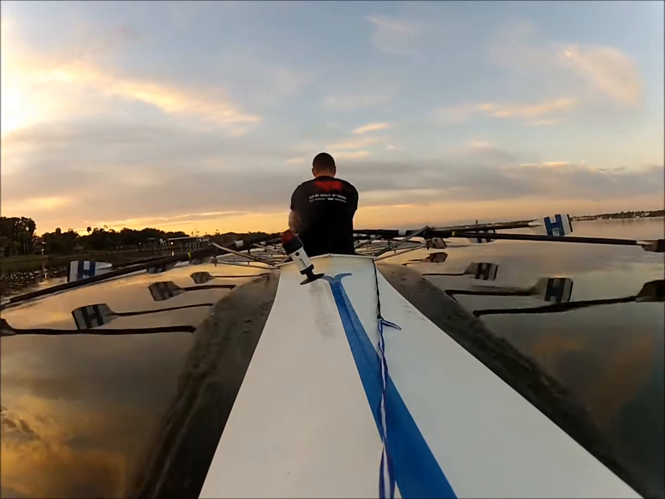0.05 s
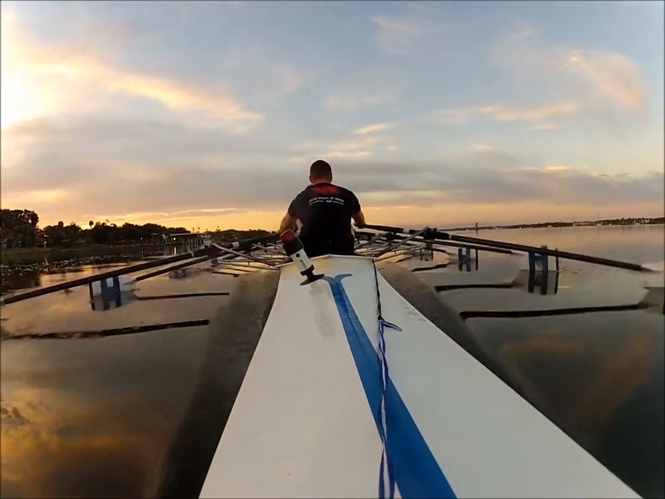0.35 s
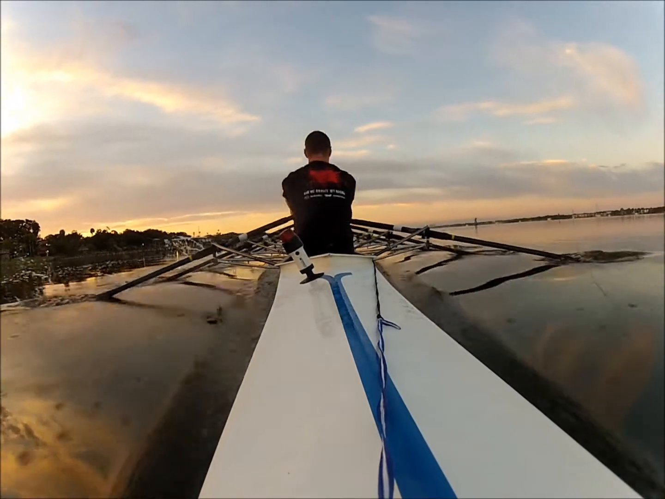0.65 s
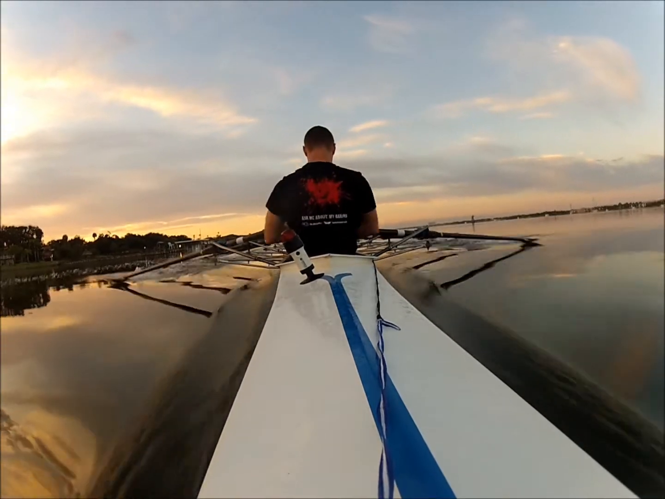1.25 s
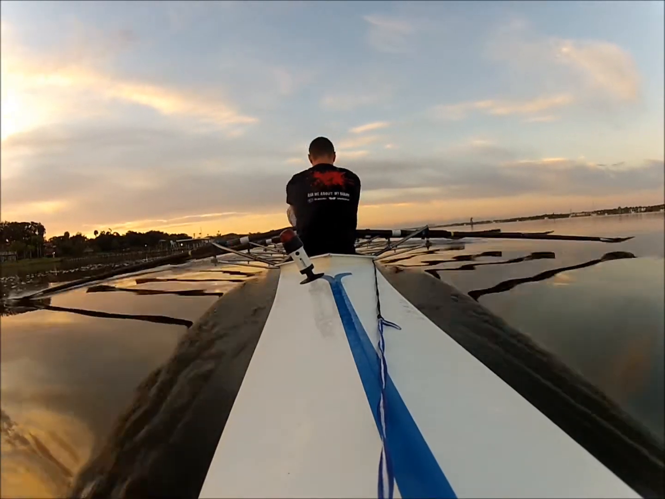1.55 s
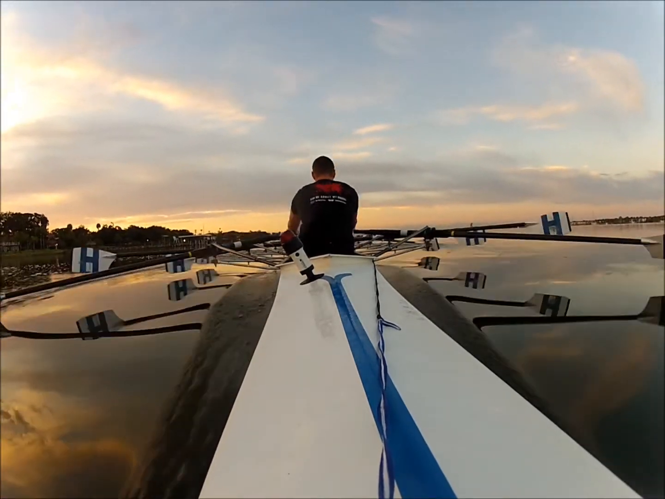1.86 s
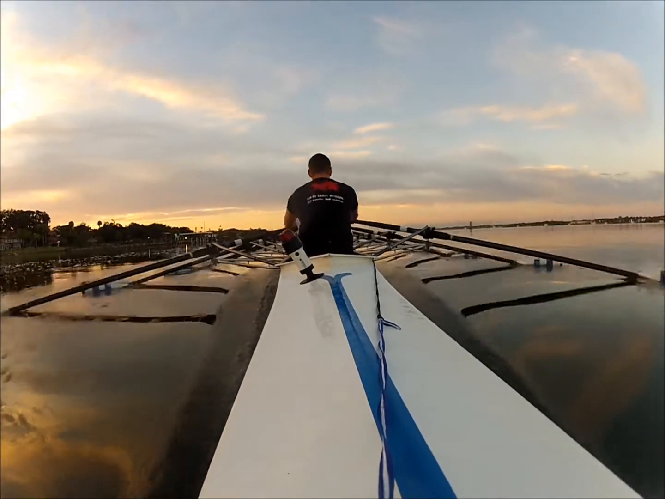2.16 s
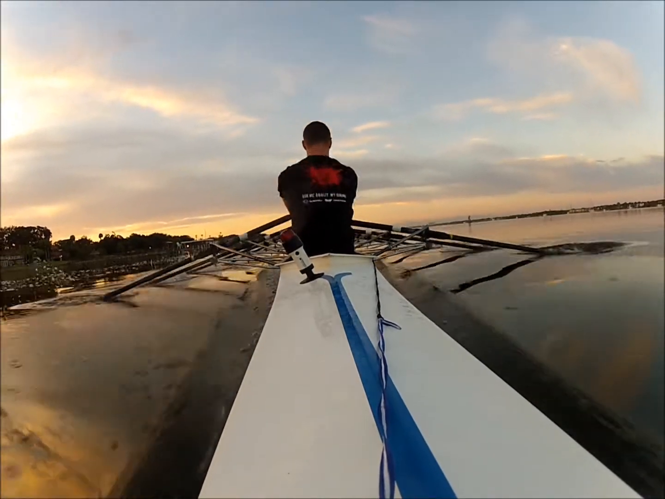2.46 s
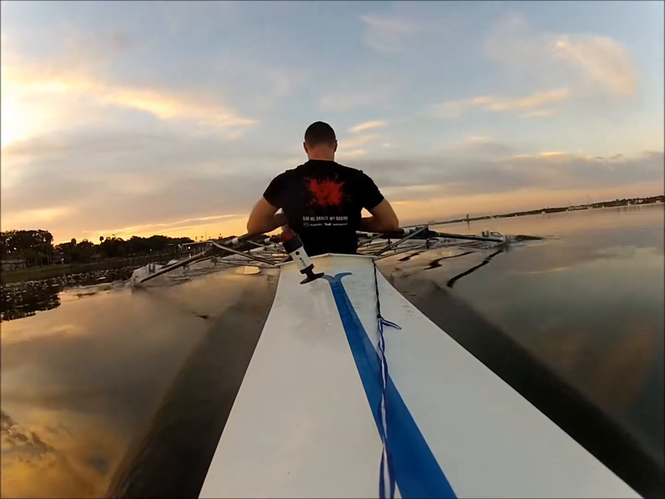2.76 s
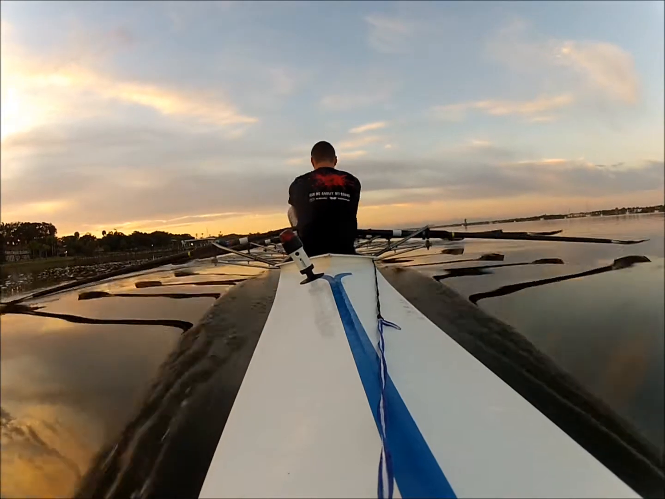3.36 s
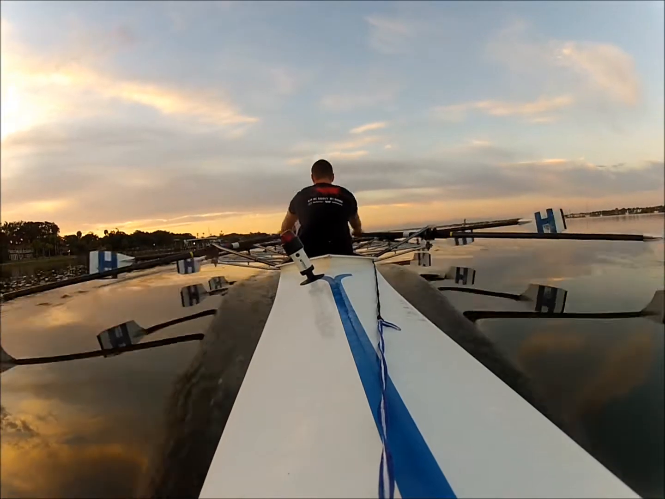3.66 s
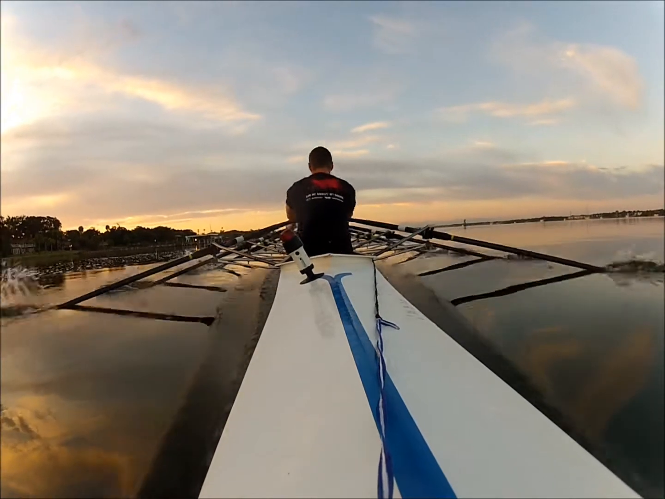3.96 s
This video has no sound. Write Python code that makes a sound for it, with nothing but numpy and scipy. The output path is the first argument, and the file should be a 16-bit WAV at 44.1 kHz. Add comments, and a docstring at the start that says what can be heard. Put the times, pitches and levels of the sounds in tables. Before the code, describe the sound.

Oars knock hollowly and rhythmically as a rowing boat moves through rushing water.

```python
"""Hollow thumps over rushing water: a racing shell is rowed, heard from a closed camera housing on deck.
At each catch and finish the oars excite the hull's resonances and clack in their locks. Seats roll
during the drive, water rushes along the hull during the recovery, and wind buffets the housing.
A fine, high crackle comes and goes. The camera clips the thumps and mirrors the sound into the treble."""
import sys
import numpy as np
from scipy.fft import rfft, irfft, next_fast_len
from scipy.io import wavfile
from scipy.ndimage import map_coordinates

SR = 44100
rng = np.random.default_rng(int(sys.argv[2]) if len(sys.argv) > 2 else 0)


def put_to_file(sound):
    """Save the sound as 16-bit audio at rate SR, in the file named by the first command-line argument."""
    columns = np.atleast_2d(sound).T  # one column per channel
    safe = np.clip(columns, -1, 1)
    whole_steps = np.round(safe * 32767)
    wavfile.write(sys.argv[1], SR, whole_steps.astype(np.int16))


N = 176400

# spectrum of wash, bubbles and oarlock rattle in the housing: (frequency [Hz], gain [dB])
HOUSING_TONE = [(100, -18), (300, -12), (400, -1.5), (580, -10), (750, 6), (900, 1.5), (1000, 0.5),
                (1120, 6.5), (1280, -2.5), (1550, 0.5), (1700, -5.5), (1830, 1), (2050, -4), (2350, 0.5),
                (2480, -4.5), (2570, -21.5), (2670, -3.5), (2950, -14), (3300, -19), (4200, -27),
                (5500, -39.5)]
# spectrum of the bright ticks: (frequency [Hz], gain [dB])
CRACKLE_TONE = [(1500, -22.5), (3000, -4), (3700, -2), (4200, -8.5), (4800, 3), (5300, 2), (5700, -6)]


def hull_thumps(overtone_ratio=1.51, overtone_db=-23):
    """Damped free vibration: each blow rings the hollow hull in one strong mode and a weak higher one."""
    # blows of oars and rigging: (time [s], level [dB], pitch [Hz])
    blows = [(0.043, -17, 213), (0.264, -13.5, 190.5), (0.287, -3.5, 180), (0.313, -2.5, 173.2),
             (.350, 0.5, 185), (.364, -3.5, 205.4), (0.388, -8, 159.7), (0.418, -5, 183.7),
             (.535, -14, 177.6), (1.077, -15, 160.4), (1.112, -16, 186), (1.173, 2, 178.2), (1.199, 1, 181),
             (1.226, -2, 186.2), (1.243, 1.5, 167.5), (1.297, -5, 172), (1.324, 0.5, 172.4),
             (1.363, -2, 184.7), (1.405, -10.5, 180.3), (1.583, -17, 185), (1.712, -17.5, 209),
             (1.787, -13, 196.6), (1.925, -11, 198), (1.991, -7.5, 175), (2.017, 0.5, 166.4),
             (2.040, -13, 169), (2.061, -0.5, 196.6), (2.074, -2, 181), (2.313, -9, 184),
             (2.513, -17.5, 193), (2.882, -11.5, 184), (2.899, 1.5, 189), (2.92, -5, 195), (2.949, -3, 179),
             (2.995, -7.5, 185), (3.033, -3.5, 180.5), (3.064, -5.5, 186), (3.51, -11, 192.6),
             (3.531, -16.5, 190), (3.673, -16, 185), (3.763, -3, 158.6), (3.799, -6, 168),
             (3.823, -2, 193.3), (3.985, -15, 192)]
    out, t = np.zeros(N), np.arange(SR // 4) / SR
    for s, db, hz in blows:
        phase = 2 * np.pi * hz * t
        overtone = amp(overtone_db) * np.sin(overtone_ratio * phase + 2 * np.pi * rng.random())
        add(out, s, amp(db) * swell(t, rise_s=0.0099, t60_s=0.099) * (np.sin(phase) + overtone))
    return out


def blade_plunges(pitch_hz=120.9, sag_hz_per_s=190, gain_db=2):
    """A damped oscillation of falling frequency: the water gulps as a blade buries."""
    # blades levering the water: (time [s], relative level [dB])
    plunges = [(0.386, -7.5), (1.371, -12), (2.075, -12), (2.105, -9), (2.178, -12), (3.109, -17),
               (3.795, -12), (3.859, -20)]
    out, t = np.zeros(N), np.arange(SR // 3) / SR
    for s, db in plunges:
        hz = pitch_hz * (1 + 0.045 * rng.standard_normal()) - sag_hz_per_s * t
        gulp = np.sin(2 * np.pi * np.cumsum(hz) / SR)
        add(out, s, amp(db + gain_db) * swell(t, rise_s=0.0057, t60_s=0.28) * gulp)
    return out


def oarlocks(rough_rad=0.13, rattle_db=-14):
    """Impact excitation: plastic rings briefly, roughened by phase jitter, with a shorter rattle."""
    # collars seating in the locks: (time [s], level [dB], pitch [Hz])
    clacks = [(0.271, -21, 1086), (.412, -15.5, 761), (1, -29.5, 1355), (1.003, -31.5, 1124),
              (1.189, -22, 1440), (1.193, -15.5, 1118), (1.205, -20.5, 883), (2.059, -20, 702),
              (2.072, -28, 812), (3.857, -16, 758)]
    ring, rattle, t = np.zeros(N), np.zeros(N), np.arange(SR // 5) / SR
    for s, db, hz in clacks:
        phase = 2 * np.pi * hz * t + rough_rad * wobble(300)[:len(t)]
        add(ring, s, amp(db) * swell(t, rise_s=0.009, t60_s=0.06) * np.sin(phase))
        add(rattle, s, amp(db + rattle_db) * swell(t, rise_s=0.009, t60_s=0.024))
    return ring + rattle * noise(HOUSING_TONE)


def hull_drumming(gain_db=2, lumpy_db=1.5):
    """Forced vibration: ripples and the moving crew keep the hull's low modes booming."""
    # strength of the boom: (time [s], relative level [dB])
    levels = [(0, -27.5), (.42, -23), (.68, -30), (1.02, -32), (1.27, -26.5), (1.65, -32.5), (2.08, -21.5),
              (2.45, -30.5), (2.75, -33), (2.99, -20), (3.3, -28), (3.62, -25.5), (3.84, -17), (4, -25)]
    # hull resonances: (frequency [Hz], gain [dB])
    tone = [(60, -19.5), (100, -4), (120, -1.5), (145, -7.5), (175, -2), (197, 6), (222, -7.5), (270, -8),
            (330, -22.5), (420, -25.5), (600, -43.5), (1200, -63.5)]
    return amp(curve(levels) + gain_db + lumpy_db * wobble(20)) * noise(tone)


def blade_churn(rough_db=2):
    """Turbulence: water splashes dully round the blades as they go in and come out."""
    # catches and finishes: (start [s], end [s], level [dB])
    churns = [(.27, .44, -28), (1.178, 1.235, -23), (1.24, 1.35, -33.5), (2.0, 2.1, -27), (2.89, 3.12, -29),
              (3.78, 3.89, -29.5)]
    # splash spectrum: (frequency [Hz], gain [dB])
    tone = [(150, 0), (270, 16), (340, 1), (420, 5.5), (560, -9.5), (740, 13), (880, 4.5), (1100, 0.5),
            (1450, -8), (2300, -21), (3300, -56), (5500, -61)]
    return spells(churns, edge_s=0.0027) * amp(rough_db * wobble(70)) * noise(tone)


def hull_wash(flutter_db=1.0, bubble_db=-5):
    """Flow noise: rushing water and gurgling bubbles, louder as the shell runs faster."""
    # water along the hull: (time [s], level [dB])
    levels = [(0, -27.5), (.2, -27), (.42, -32), (.73, -37.5), (.88, -39), (.995, -42), (1.01, -37.5),
              (1.16, -33), (1.3, -34.5), (1.55, -30.5), (1.9, -26), (2.15, -33.5), (2.5, -37.5),
              (2.56, -41), (2.72, -38), (2.83, -36), (2.97, -35.5), (3.2, -33), (3.52, -27), (3.74, -28),
              (3.92, -32.5), (4, -36.5)]
    gain = amp(curve(levels) + flutter_db * wobble(35))
    return gain * unit(noise(HOUSING_TONE) + amp(bubble_db) * bubbles())


def bubbles(per_s=160, typical_hz=1601.5, life_cycles=9.4, rise_per_life=0.0412):
    """Bubble resonance: each pocket of air rings briefly and rises in pitch."""
    spread_octaves, spread_db = 0.5, 2.5
    out, t = np.zeros(N), np.arange(SR // 25) / SR
    for pitch, size in np.clip(rng.standard_normal((int(per_s * N / SR), 2)), -2, 2):
        cycles = typical_hz * 2 ** (spread_octaves * pitch) * t
        age = cycles / life_cycles
        chirp = age * np.exp(-age) * np.sin(2 * np.pi * cycles * (1 + rise_per_life * age / 2))
        add(out, rng.random() * N / SR, amp(spread_db * size) * chirp)
    return unit(coloured(out, HOUSING_TONE))


def seats():
    """Rolling noise: wheels rumble on their tracks while the legs push."""
    # slides toward the bow: (start [s], end [s], level [dB])
    slides = [(0.493, 0.765, -29), (2.21, 2.518, -29.5), (3.949, 4.2, -26.5)]
    # rumble spectrum: (frequency [Hz], gain [dB])
    tone = [(200, -7), (450, -3), (620, -11.5), (760, 2.5), (950, 0), (1150, -3), (1450, -12.5),
            (2200, -30), (3200, -54), (5500, -75)]
    return spells(slides, edge_s=0.027) * amp(wobble(50)) * noise(tone)


def loud_crackles(count=8, burst_s=0.0075, gain_db=16, fade_db=1.5):
    """Filtered impulses: short, bright crackles, each a handful of fading ticks."""
    # bursts of ticks: (time [s], relative level [dB])
    bursts = [(0.0209, -36), (0.1344, -41.5), (0.2284, -36.5), (0.304, -33.5), (0.3226, -36), (0.351, -31),
              (0.41, -35), (0.5114, -41.5), (0.5255, -33), (1.2394, -40), (1.2905, -26.5), (1.3207, -25),
              (1.336, -28.5), (1.364, -25.5), (1.3874, -28.5), (1.415, -25.5), (1.509, -28),
              (1.5302, -28.5), (1.5557, -26.5), (1.625, -30.5), (1.6743, -34.5), (1.8168, -42),
              (2.0492, -31), (2.2408, -37), (2.9871, -29), (3.057, -25), (3.089, -26), (3.1068, -35.5),
              (3.1257, -26.5), (3.1596, -28.5), (3.4007, -31), (3.439, -30), (3.5902, -39), (3.8026, -29),
              (3.8345, -26.5), (3.902, -27), (3.931, -30.5), (3.9756, -29)]
    ticks = np.zeros(N)
    for s, db in bursts:
        for k, delay in enumerate(np.sort(rng.random(count)) * burst_s):
            add(ticks, s + delay, amp([db + gain_db - fade_db * k]) * rng.choice([-1, 1]))
    return coloured(ticks, CRACKLE_TONE)


def fine_crackle(first_ticks_per_s=210, thinning=0.67, uneven=0.41, fade_db=9, scatter_db=3):
    """Shot noise: runs of fine, high ticks that thin out and fade."""
    # runs of ticks: (start [s], duration [s], opening level [dB])
    runs = [(0, 0.54, -47.5), (0.492, 0.086, -39.5), (1.233, 0.47, -35), (1.754, 0.26, -45),
            (2.07, .03, -47), (2.25, 0.034, -46.5), (2.418, 0.021, -47), (2.758, 0.19, -46.5),
            (2.95, 0.67, -37.5), (3.985, 0.026, -34.5)]
    envelope, t = np.zeros(N), np.arange(SR // 100) / SR
    tick_decay = np.exp(-t / 0.0017)
    for start, length, db in runs:
        s = 0
        for gap, size in rng.standard_normal((200, 2)):
            if s >= length:
                break
            age = s / length
            add(envelope, start + s, amp(db - fade_db * age + scatter_db * size) * tick_decay)
            s += np.exp(thinning * age + uneven * gap) / first_ticks_per_s
    return envelope * noise(CRACKLE_TONE)


def wind(gain_db=2, gust_db=1.5):
    """Turbulent pressure fluctuations: wind buffets the housing with a low, lumpy rumble."""
    # gusts: (time [s], relative level [dB])
    levels = [(0, -37), (.13, -58), (.25, -26.5), (.42, -23), (.65, -34), (.76, -47), (1.12, -40.5),
              (1.22, -23), (1.42, -21), (1.72, -37), (1.9, -47), (2.0, -24.5), (2.3, -44), (2.84, -42),
              (2.96, -19), (3.12, -19), (3.25, -26), (3.45, -27), (3.6, -46.5), (3.73, -34), (3.82, -25),
              (4, -39)]
    # buffeting spectrum: (frequency [Hz], gain [dB])
    tone = [(12, -5.5), (27, 0), (42, 1), (58, -5), (78, -7), (110, -4), (250, -25.5), (800, -65)]
    return amp(curve(levels) + gain_db + gust_db * wobble(14)) * noise(tone)


def lapping(level_db=-48.5, waver_db=1.9):
    """Amplitude-modulated noise: calm water murmurs faintly throughout."""
    # murmur spectrum: (frequency [Hz], gain [dB])
    tone = [(250, 8), (550, -1), (900, -8), (2500, -8), (4000, -17.5), (5500, -31.5)]
    return amp(level_db + waver_db * wobble(8.6)) * noise(tone)


def amp(db):
    """Decibels to gain."""
    return 10 ** (np.asarray(db) / 20)


def unit(x):
    """Normalisation to rms 1."""
    return x / np.sqrt(np.mean(x ** 2) + 1e-20)


def clock():
    """The time of every sample."""
    return np.arange(N) / SR


def curve(rows):
    """Linear interpolation of (time [s], value) rows."""
    return np.interp(clock(), *np.transpose(rows))


def wobble(rate):
    """A smooth random curve, rate knots a second."""
    return map_coordinates(rng.standard_normal(int(N * rate / SR) + 4), [clock() * rate])


def swell(t, rise_s, t60_s):
    """A soft attack and an exponential decay, peak 1."""
    shape = (1 - np.exp(-(t / rise_s) ** 2)) * amp(-60 * t / t60_s)
    return shape / shape.max()


def spells(rows, edge_s):
    """A soft gate for each (start [s], end [s], level [dB]) row."""
    t, gain = clock(), np.zeros(N)
    for start, end, db in rows:
        opening = 0.5 + 0.5 * np.tanh((t - start) / edge_s)
        closing = 0.5 + 0.5 * np.tanh((end - t) / edge_s)
        gain += amp(db) * opening * closing
    return gain


def filtered(x, response):
    """Linear filtering: the spectrum of x times a frequency response."""
    size = next_fast_len(N + SR // 2)
    return irfft(rfft(x, size) * response(np.fft.rfftfreq(size, 1 / SR)), size)[:N]


def coloured(x, tone):
    """Spectral shaping by (frequency [Hz], gain [dB]) points."""
    points_hz, db = np.transpose(tone)
    return filtered(x, lambda hz: amp(np.interp(np.log(hz + 1), np.log(points_hz), db)))


def noise(tone):
    """Coloured noise of rms 1."""
    return unit(coloured(rng.standard_normal(N), tone))


def add(track, s, sound):
    """Mixes a sound into the track at time s."""
    part = track[max(round(s * SR), 0):][:len(sound)]
    part += sound[:len(part)]


def scene():
    """Superposition: boat, water, crackle and wind sum into one channel."""
    boat = hull_thumps() + oarlocks() + seats() + hull_drumming()
    water = blade_plunges() + blade_churn() + hull_wash() + lapping()
    crackle = fine_crackle() + loud_crackles()
    return (boat + water + crackle + wind())[None]


def record(dry, ceiling=0.98, edge_hz=5820, hold_hz=12000, top_hz=15250):
    """Clipping and spectral imaging: the camera's sample-and-hold mirrors the sound around its rate."""
    clipped = np.clip(dry[0], -ceiling, ceiling)
    base = filtered(clipped, lambda hz: 1 / np.sqrt(1 + (hz / edge_hz) ** 40))
    # differentiate, shift, integrate: each image is scaled by source frequency over image frequency
    slope = filtered(base, lambda hz: 1j * hz)
    sidebands = slope * 2 * np.cos(2 * np.pi * hold_hz * clock())
    images = filtered(sidebands, lambda hz: 1 / (1j * np.maximum(hz, hold_hz / 2)))
    return filtered(base + images, lambda hz: hz < top_hz)[None]


dry = scene()
out = record(dry)
put_to_file(out)
```